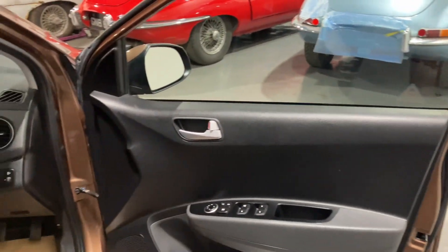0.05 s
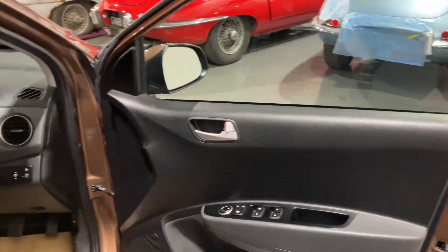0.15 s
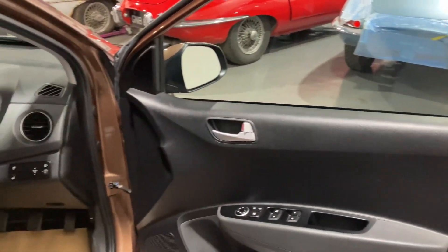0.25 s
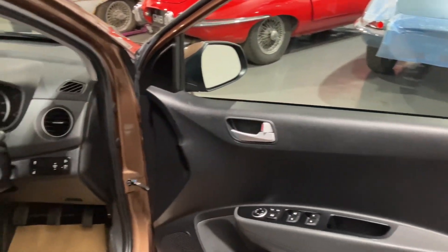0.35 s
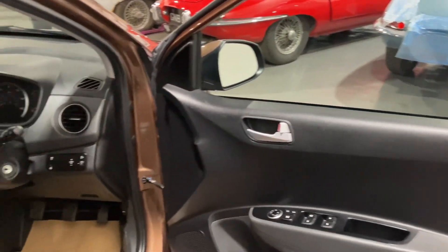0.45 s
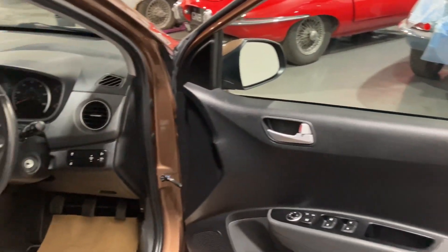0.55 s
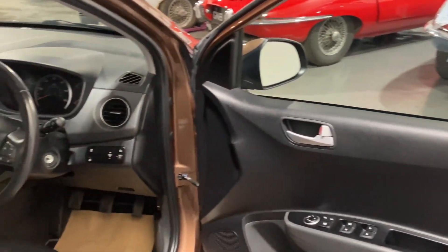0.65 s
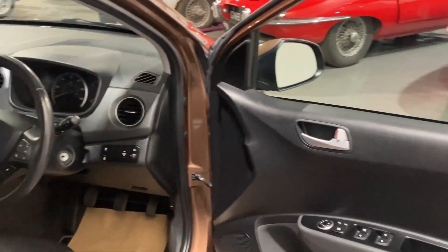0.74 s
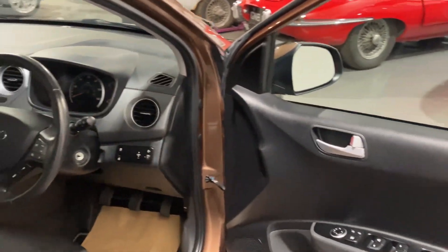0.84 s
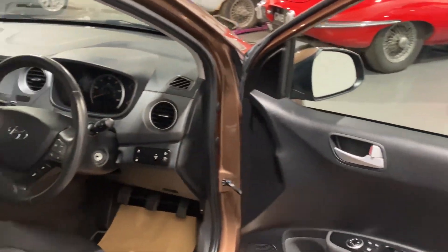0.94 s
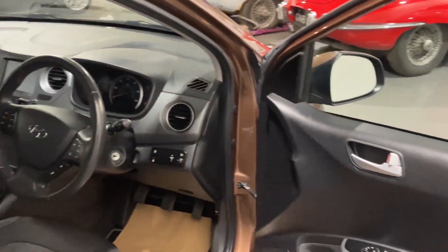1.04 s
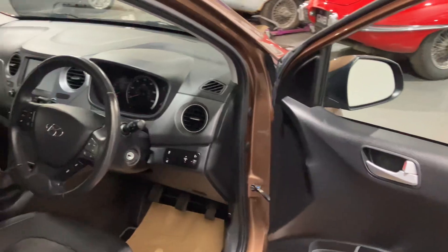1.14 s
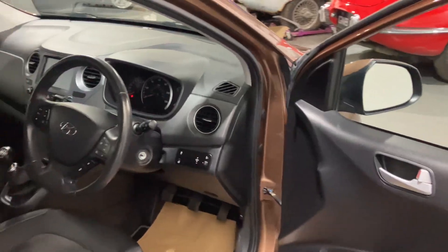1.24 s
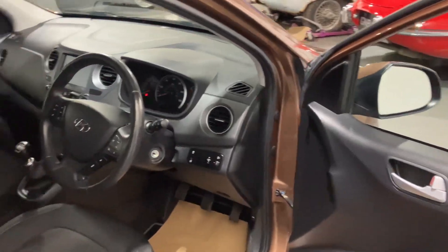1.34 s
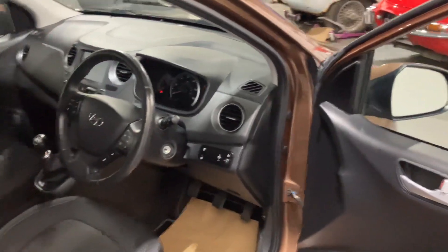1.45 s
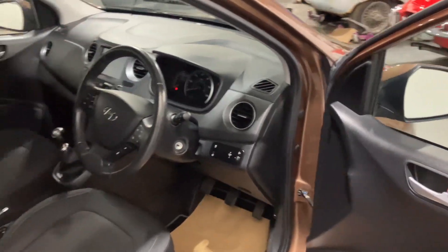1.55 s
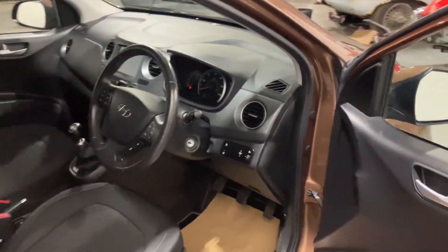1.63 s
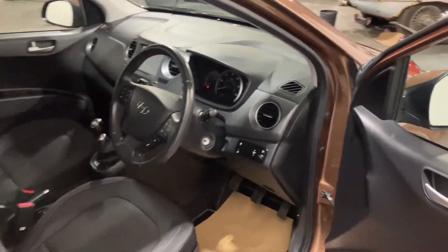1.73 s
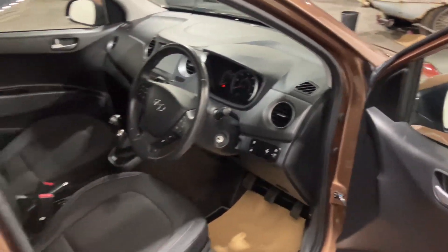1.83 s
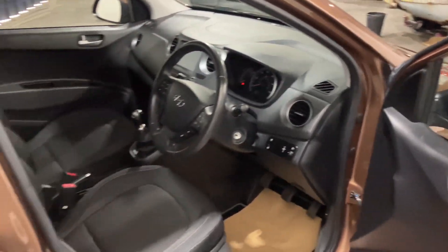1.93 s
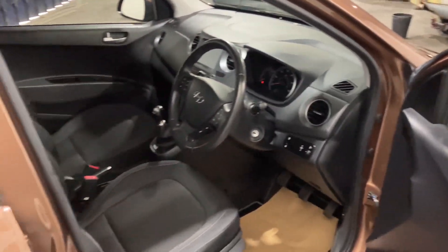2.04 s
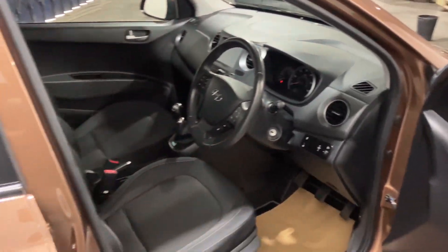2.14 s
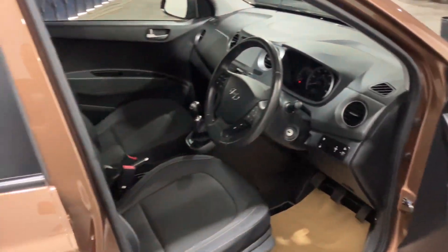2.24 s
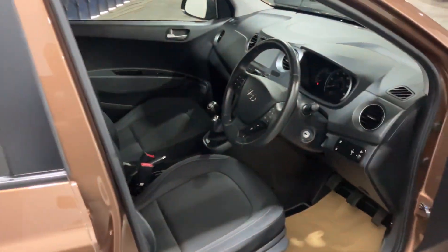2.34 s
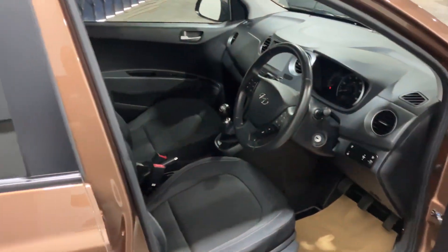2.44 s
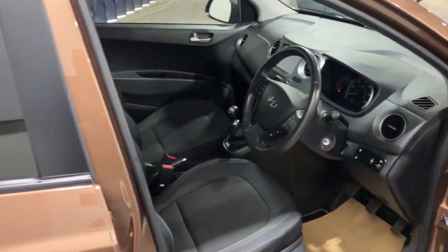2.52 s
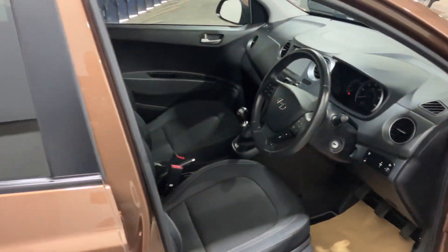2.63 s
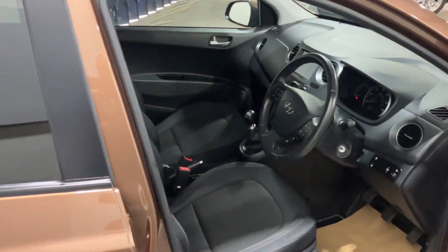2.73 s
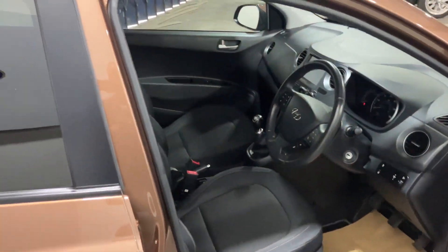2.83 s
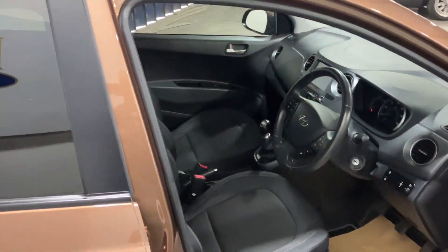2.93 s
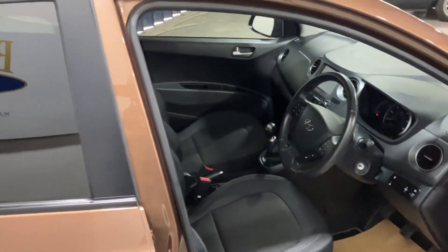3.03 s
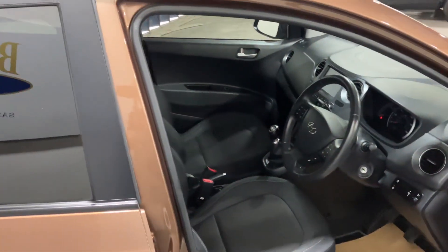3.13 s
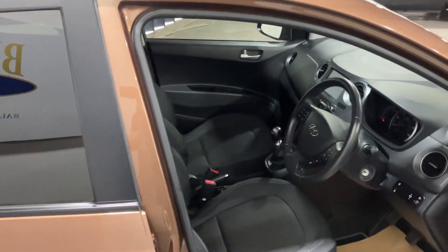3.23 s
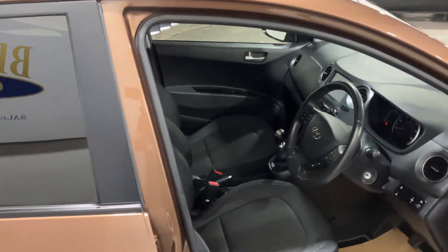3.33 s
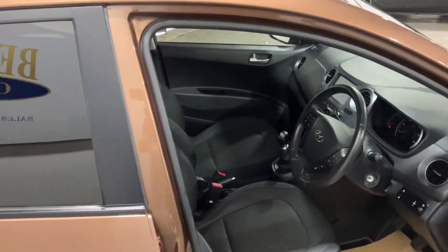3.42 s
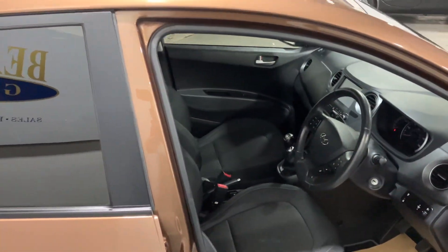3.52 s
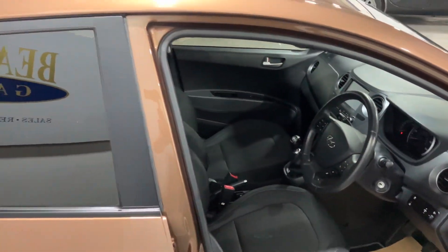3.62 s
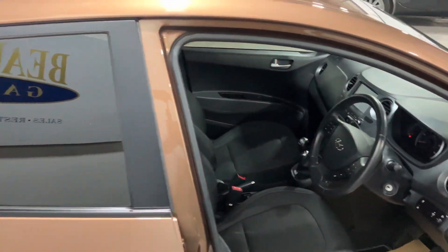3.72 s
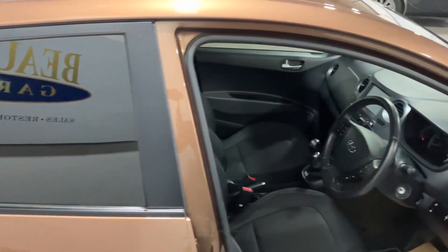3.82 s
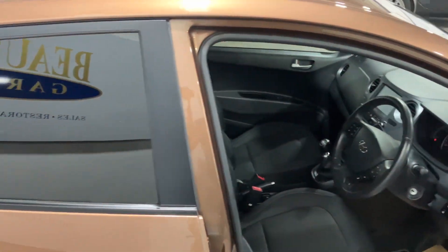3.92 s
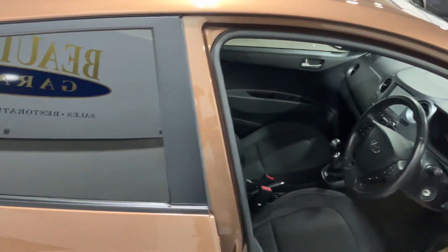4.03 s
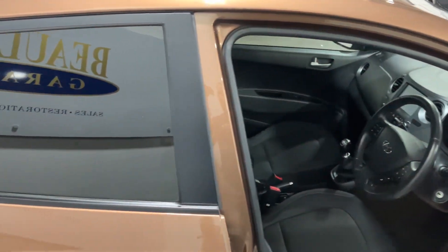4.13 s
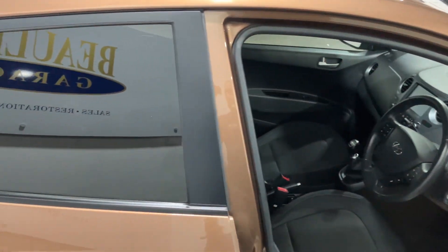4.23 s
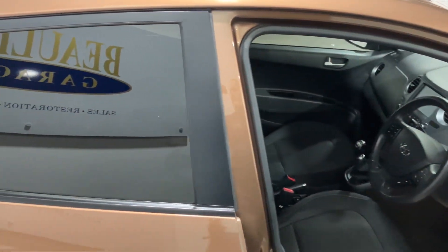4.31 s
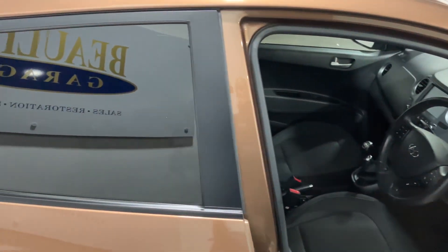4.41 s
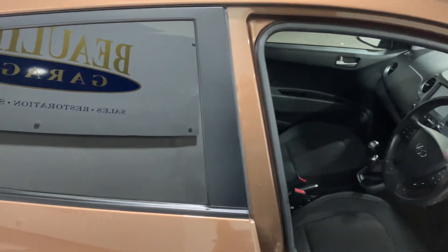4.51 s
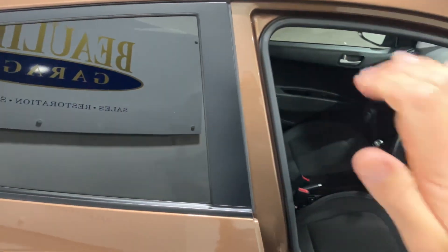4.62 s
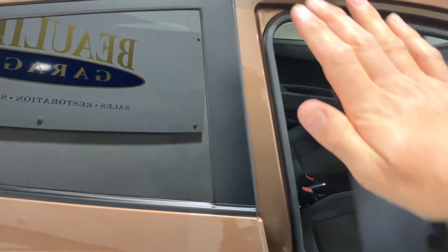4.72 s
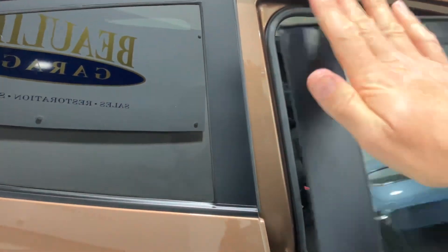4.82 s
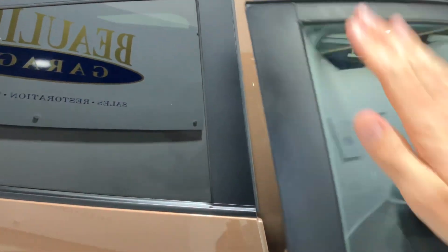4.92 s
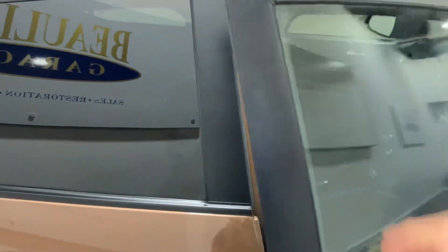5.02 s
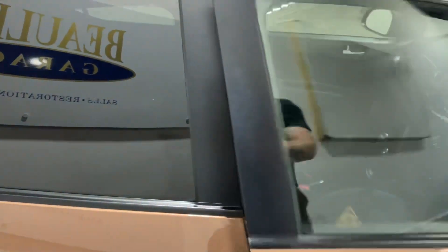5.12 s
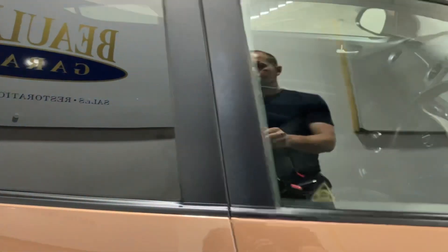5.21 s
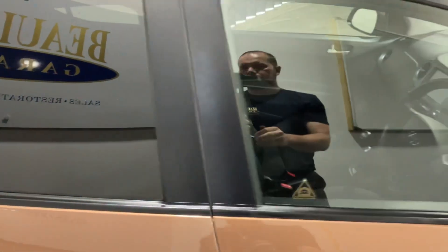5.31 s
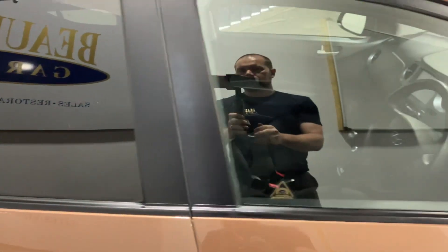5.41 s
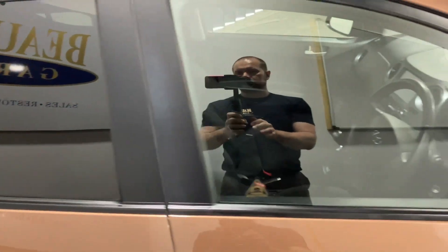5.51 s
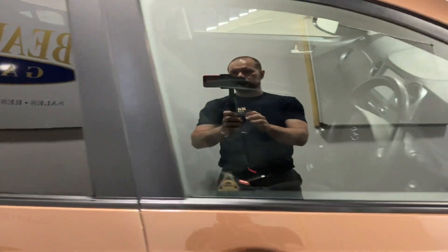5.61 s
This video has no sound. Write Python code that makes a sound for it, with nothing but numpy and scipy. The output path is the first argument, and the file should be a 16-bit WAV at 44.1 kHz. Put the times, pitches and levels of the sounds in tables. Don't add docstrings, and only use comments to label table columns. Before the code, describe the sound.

Inside a large hard-floored hall, a hand-held phone picks up low traffic rumble and a faint distant engine rev. Light clicks, rustling and a loud sharp snap come early, followed by more clicks and soft footsteps. After a quiet stretch, a car door at arm's length is pushed shut: brief air rush, latch crack, deep boom, rattling trim and a decaying hall echo.

```python
import sys
import numpy as np
from scipy import signal
from scipy.fft import rfft, irfft, next_fast_len
from scipy.io import wavfile
from scipy.ndimage import uniform_filter1d

SR = 44100
rng = np.random.default_rng(int(sys.argv[2]) if len(sys.argv) > 2 else 0)


def gain_from_db(level_db):
    decades = np.asarray(level_db, float) / 20
    return 10 ** decades


def store_pcm(level_fs):
    pcm = np.round(np.clip(level_fs, -1, 1) * 32767).astype(np.int16)
    wavfile.write(sys.argv[1], SR, np.atleast_2d(pcm).T)


N = 249606
T, SIZE = np.arange(N) / SR, next_fast_len(N + 8192, True)
F = np.arange(SIZE // 2 + 1) * SR / SIZE + 1e-3

LATCH_S = 5.2345
BEND_S = .0028


def on_log(table, hz, index=1):
    table = np.array(table)
    return np.interp(np.log(hz), np.log(table[:, 0]), table[:, index])


def column(table, index, x):
    table = np.array(table)
    return np.interp(x, table[:, 0], table[:, index])


def shape(x, gain):
    return irfft(rfft(x, SIZE) * gain, SIZE)[..., :N]


def low_cut(hz, order):
    return 1 / (1 + (hz / F) ** order)


def unit(x):
    return x / np.sqrt(np.mean(x ** 2))


def band(hz, octaves):
    return np.exp(-.5 * (np.log2(F / hz) / octaves) ** 2)


def walk(rate_hz):
    k = int(SR / rate_hz)
    held = np.repeat(rng.standard_normal(N // k + 1), k)
    return 2.29 * uniform_filter1d(uniform_filter1d(held, k), k)[:N]


def pair(hz, octaves):
    # hz, correlation [0 to 1]
    likeness = [(60, .93), (130, .75), (400, .55), (1400, .2), (3000, .5), (4600, .1), (6000, .4),
                (7500, .8), (8800, .97), (15000, .97)]
    c = on_log(likeness, F)
    noise = rng.standard_normal((2, SIZE))
    mid, side = shape(noise, band(hz, octaves) * np.sqrt([1 + c, 1 - c]))
    return unit(np.array([mid + side, mid - side]))


def ring(start_s, modes):
    t = np.clip(T - start_s, 0, None)
    live = slice(int(start_s * SR), int((start_s + .8) * SR))
    out = np.zeros(N)
    for hz, db, t60_s in modes:
        out[live] += gain_from_db(db - 60 * t[live] / t60_s) * np.sin(2 * np.pi * hz * t[live])
    return out


def place(x, pan_db, lag_s):
    left = shape(x, gain_from_db(pan_db / 2) * np.exp(-2j * np.pi * F * lag_s))
    return np.array([left, x * gain_from_db(-pan_db / 2)])


def tone(times_s, hz, db, wobble, flicker_db, rate_hz):
    edge = np.clip(np.minimum(T - times_s[0], times_s[-1] - T) / 0.055, 0, 1)
    cycles = np.cumsum(np.interp(T, times_s, hz) * (1 + wobble * walk(rate_hz))) / SR
    level = gain_from_db(np.interp(T, times_s, db) + flicker_db * walk(rate_hz))
    return np.sqrt(2) * edge * level * np.sin(2 * np.pi * cycles)


def rustle(table, octaves):
    out = 0
    for start_s, length_s, db, hz in table:
        u = np.clip((T - start_s) / length_s, 0, 1)
        swell = np.sin(np.pi * u ** .4) ** 0.72
        out = out + pair(hz, octaves) * gain_from_db(db + 2.14 * walk(250)) * swell
    return out


def clicks(table, ring_s, crack_s, contact_s, low_hz):
    colour = band(3450, 0.3) + .5 * band(7400, 1.0) + 0.19 * band(14000, 0.84) + 0.053 * band(3300, .9)
    hiss = unit(shape(rng.standard_normal(N), colour))
    out = np.zeros((2, N))
    size = int(contact_s * SR)
    for start_s, db, hz, crack_db, pan_db in table:
        r = rng.standard_normal(200)
        t60_s = ring_s(hz)
        over_hz, under_hz = hz * (1.5 + 0.056 * r[0]), hz * (.75 + 0.01 * r[1])
        body = ring(start_s, [(hz, -1, t60_s), (-over_hz, -6, 0.28 * t60_s), (-under_hz, -7, t60_s)])
        contact = np.hanning(size) * (1 + .3 * r[:size]) * 2 / size
        body = signal.fftconvolve(body, contact)[:N]
        after = np.clip(T - start_s, 0, 1) / crack_s
        burst = after * np.exp(1 - after)
        tail = .1 * (T > start_s) * np.exp(-after / 9)
        crack = hiss * gain_from_db(crack_db + 2.5) * (burst + tail)
        out += gain_from_db(db + np.array([[pan_db], [-pan_db]]) / 2) * (body + crack)
    return shape(out, low_cut(low_hz, 4))


def hush():
    # start_s, level_db
    rumble = [(0.0, -53.5), (0.03, -64), (1.26, -59), (1.48, -54), (1.97, -61.5), (2.31, -58), (3.25, -62),
              (4.42, -57.5), (4.58, -63.5), (4.63, -56), (5.08, -59), (5.15, -57)]
    # hz, level_db [per Hz]
    spectrum = [(18, -25), (28, -15.5), (40, -2.5), (60, -0.5), (85, -2), (125, -9.5), (170, -14.5),
                (250, -24.5), (420, -22.5), (600, -31), (1700, -39.5), (4000, -47.5), (10000, -48),
                (16000, -55.5)]
    hush_db = -56.5
    deep_db = column(rumble, 1, T) + 1.4 - hush_db
    upper_db = 0.41 * deep_db + 1.5 * walk(18) - 0.85
    out = 0
    for hz in 22 * 2 ** np.arange(0, 9.6, .4):
        swell_db = deep_db if hz < 130 else upper_db * np.clip(np.log2(1600 / hz) / 1.3, 0, 1)
        drift_db = 1.8 * walk(14) * (150 < hz < 900) + .8 * walk(7.5)
        out = out + pair(hz, 0.2) * np.sqrt(hz) * gain_from_db(on_log(spectrum, hz) + swell_db + drift_db)
    return out * gain_from_db(hush_db - 24.0)


def engine():
    times_s = [.2, 1.5, 1.85]
    return tone(times_s, [54, 70.4, 66.4], [-69.5, -58, -71], 0.0077, 2.3, 8)


def whines():
    # start_s, loudest_s, end_s, pitch_hz, peak_db
    runs = [
        (0.855, .98, 1.15, 2900, -82.5),
        (1.17, 1.24, 1.87, 2873, -83),
        (3.33, 3.58, 4.22, 8720, -82.5),
        (5.295, 5.45, 5.2, 8600, -78.5),
    ]
    out = 0
    for start_s, peak_s, end_s, hz, db in runs:
        wobble, rate_hz, lag_s = (.024, 600, -.00017) if hz < 5000 else (.004, 150, .000064)
        faint_db = db - 14.5 * min(end_s - start_s, 1)
        line = tone([start_s, peak_s, end_s], [hz] * 3, [faint_db, db, faint_db], wobble, 2.66, rate_hz)
        out = out + place(line, 0, lag_s)
    return out


def weight_shifts():
    # start_s, length_s, level_db, centre_hz
    thuds = [(0, 0.2, -69, 222), (1.0, 0.36, -74.5, 260), (1.452, .05, -63, 340), (2.39, 0.37, -72.5, 248),
             (3.2, 0.13, -75, 201), (3.46, 0.059, -66.5, 196.4), (4.1, 0.14, -72.5, 304),
             (4.5, 0.28, -72.5, 250), (5.0, 0.11, -71, 296)]
    return rustle(thuds, .5)


def cloth():
    # start_s, length_s, level_db, centre_hz
    brushes = [(0.311, 0.21, -78.5, 8000), (0.557, 0.11, -70, 4000), (0.65, 0.1, -66.5, 1100),
               (.66, 0.17, -71, 4600), (1.188, 0.12, -77.5, 6440), (1.447, 0.018, -44, 2240),
               (1.47, 0.27, -70.5, 3030), (1.645, 0.015, -53.5, 1900), (1.6, 0.14, -76, 9400),
               (2.25, 0.085, -68, 4950), (2.273, 0.036, -59.5, 900), (2.364, 0.019, -57.5, 2500),
               (2.364, 0.18, -69, 3600), (2.427, 0.042, -60.5, 1570), (2.859, 0.13, -80.5, 8250),
               (3.429, 0.041, -69.5, 6000), (3.5, 0.025, -85, 3500), (4.379, 0.067, -71.5, 890),
               (4.62, 0.078, -77.5, 2000), (4.705, 0.1, -74, 4610)]
    return rustle(brushes, 1.05)


def soles():
    # start_s, length_s, level_db, centre_hz
    drags = [(0, 0.043, -73.5, 1530), (0.0067, 0.19, -82.5, 3620), (.085, 0.06, -77.5, 1490),
             (0.785, 0.052, -65, 370), (1.44, 0.016, -59.5, 3895), (2.03, 0.065, -84, 9540),
             (2.367, 0.015, -54.5, 936), (2.7, 0.035, -75, 348), (3.436, 0.073, -68.5, 485),
             (3.429, 0.031, -72, 1625), (4.392, 0.075, -66, 457), (4.511, 0.054, -65, 400),
             (4.609, 0.057, -78.5, 2910), (4.725, 0.059, -74.5, 3300), (4.732, 0.057, -68.5, 1440)]
    return rustle(drags, 0.321)


def squeaks():
    # start_s, length_s, level_db, centre_hz
    narrow_patches = [
        (1.3, 0.46, -87, 3370),
        (1.646, 0.01, -43, 3310),
        (2.364, 0.01, -42.5, 3520),
    ]
    return rustle(narrow_patches, 0.042)


def footsteps():
    # start_s, peak_db, ring_hz, crack_db, pan_db [left minus right]
    steps = [
        (1.452, -64, 592, -15, 5),
        (2.284, -53.5, 316, -17, 0),
        (2.824, -43, 113.2, -41.5, -5),
        (3.428, -45, 504, -21.5, 2),
    ]
    return clicks(steps, lambda hz: .08, 0.0036, 0.0016, 70)


def joint_clicks():
    # start_s, peak_db, ring_hz, crack_db, pan_db [left minus right]
    ticks = [(0.09, -59.5, 840, -16, -4), (0.56, -52.5, 1290, 0, -8), (0.607, -50.5, 2020, -33, -14),
             (0.777, -67, 960, -11, -17), (1.217, -53, 880, -13, -9), (1.359, -64, 1040, -23, -10),
             (1.647, -39, 933, -5.5, 0), (1.663, -47.5, 1220, 2.5, -4.5), (1.878, -52, 1215, -11, -11),
             (1.973, -58.5, 1196, -32, -0.5), (2.251, -64, 1000, -6, -7), (2.276, -37.5, 1210, -10.5, -3.5),
             (2.365, -30, 1890, -6, -2.5), (2.432, -48.5, 1140, -7.5, -5), (2.58, -57.5, 1784, -31, -1.0),
             (2.613, -55, 1900, -21, -4), (2.684, -64.5, 1433, -15.5, 5.5),
             (3.299, -69.5, 840, -7.5, -12.5)]
    cycles = 19.2
    return clicks(ticks, lambda hz: cycles / hz, 0.000613, .0004, 620)


def snap():
    # start_s, peak_db, pan_db [left minus right]
    event = [
        (1.454, -15, -3),
    ]
    # mode_hz, level_db, t60_s
    modes = [(810, -16.5, 0.0047), (988, -13, 0.018), (1256, 0, 0.019), (1418, 1.5, 0.0091),
             (1644, -5.5, 0.015), (1874, -16.5, 0.0098), (2472, -18.5, .006), (3053, -8.5, 0.0045),
             (3500, -6, 0.012), (4086, -6, 0.0055), (5240, -14.5, .005), (6850, -9, 0.0066),
             (9400, -18, .004)]
    start_s, db, pan_db = event[0]
    body = ring(start_s + .0003, modes[:6]) + ring(start_s, modes[6:])
    body = body + gain_from_db(-11.0) * ring(start_s + .0035, modes[:8])
    after = np.clip(T - start_s, 0, 1)
    decay = gain_from_db(-16.5) * np.exp(-after / .0015) + gain_from_db(-20.0) * np.exp(-after / .012)
    crack = pair(2500, 0.91) * (T > start_s) * decay
    return shape(place(gain_from_db(db - 6.0) * body, pan_db, 0) + gain_from_db(db) * crack, low_cut(720, 6))


def air_rush():
    start_s, peak_s, stop_s = 5.165, 5.234, 0.018
    early_s = np.clip(peak_s - T, 0, 1)
    top_hz = 1100 * 2 ** (-13 * early_s)
    rush = 0
    for hz in [200, 400, 800, 1600, 3200, 6400]:
        rush = rush + pair(hz, 0.56) * np.sqrt(hz / 400) / (1 + (hz / top_hz) ** 3.07)
    level = gain_from_db(-31.5 - 458 * early_s)
    opening = np.clip((T - start_s) / 0.013, 0, 1)
    return rush * level * opening * np.clip(1 - (T - peak_s) / stop_s, 0, 1)


def latch():
    # hz, level_db [per Hz]
    spectrum = [(88, -31), (150, -5), (346, 1.5), (925, 1.5), (1260, -12), (2300, -21), (2780, -29.5),
                (3670, -21.5), (5000, -47), (6500, -75), (11000, -120)]
    sweep = np.exp(-2j * np.pi * (F * LATCH_S + 2 * BEND_S * np.sqrt(1000 * F)))
    crack = irfft(gain_from_db(on_log(spectrum, F)) * (F > 120) * sweep, SIZE)[:N]
    return crack * gain_from_db(-5.5) / np.abs(crack).max()


def boom():
    # start_s, gain [negative is inverted]
    blows = [
        (5.2431, 1),
        (5.2808, .9),
        (5.436, -.13),
        (5.4737, -.07),
    ]
    # mode_hz [negative starts the other way], level_db, t60_s
    modes = [(53.5, -3.4, .19), (63.6, -14.4, .96), (-68.3, 0, .04), (75.8, -16.1, .38), (-80.7, -7.5, .12),
             (143.9, -20.5, .17)]
    struck = sum(gain * ring(start_s, modes) for start_s, gain in blows)
    return uniform_filter1d(struck, int(.003 * SR))


def panel_rings():
    # mode_hz, level_db, t60_s
    modes = [(176, -23, 0.18), (209, -26, 0.18), (237.4, -21, 0.16), (307, -24, 0.16), (343, -25.5, 0.13),
             (393.3, -26, 0.15), (495, -34, 0.18), (580, -26, 0.061), (668, -34, 0.11), (826, -32, 0.1),
             (915, -50, 0.078), (984, -22, 0.09), (1275, -30, 0.099), (1390, -34, 0.057)]
    # start_s, level_db
    rebounds = [
        (5.251, -5),
        (5.2585, -9.5),
        (5.2761, -12.5),
    ]
    panel = ring(LATCH_S + 2 * BEND_S, modes)
    for start_s, db in rebounds:
        struck = []
        for hz, mode_db, t60_s in modes:
            r, q = rng.standard_normal(2)
            struck.append((hz * (1 + 0.0275 * r) * np.sign(r), mode_db + 2.2 * q, t60_s))
        panel = panel + gain_from_db(db) * ring(start_s, struck)
    return panel


def jolt(peak_s, t60_s):
    rise = np.clip(1 + (T - peak_s) / 0.012, 0, 1) ** 2
    return gain_from_db(-60 * np.clip(T - peak_s, 0, 9) / t60_s) * rise


def rattle():
    # peak_s, trim_db, glass_db
    jolts = [
        (5.222, -43, -62),
        (5.237, -27, -44),
        (5.254, -22.5, -47.5),
        (5.298, -65, -55.5),
    ]
    trim = pair(493, 0.78) + gain_from_db(-5) * pair(1374, 0.37) + gain_from_db(-12) * pair(2610, 0.5)
    glass = gain_from_db(2.5) * pair(5040, 0.45) + pair(8370, 0.42) + gain_from_db(-10.5) * pair(13000, 0.46)
    out = jolt(jolts[-1][0], 1.26) * (gain_from_db(-44.5) * trim + gain_from_db(-67.5) * glass)
    for peak_s, trim_db, glass_db in jolts:
        out = out + jolt(peak_s, 0.076) * (gain_from_db(trim_db) * trim + gain_from_db(glass_db) * glass)
    return gain_from_db(1.7 * walk(300)) * out


def door():
    metal = place(latch() + panel_rings(), 0, -0.00017)
    return boom() + metal + air_rush() + rattle()


def hall(x):
    # band_hz, level_db, t60_s
    decays = [(59.65, -29, 0.91), (119.4, -12.5, 1.1), (250.3, -9.5, 0.76), (400, -11, 0.91),
              (752, -15.5, 1.4), (1297, -13, 1.3), (2196, -14, 1.4), (4000, -11, 1.3), (7030, -11, 0.27),
              (14000, -19, 0.38)]
    answer = 0
    for hz in 45 * 2 ** np.arange(0, 8.6, .6):
        t60_s = on_log(decays, hz, index=2)
        fade = gain_from_db(on_log(decays, hz) - 60 * np.minimum(T, 2) / t60_s)
        answer = answer + pair(hz, 0.38) * np.sqrt(hz / t60_s) * fade
    answer = answer * np.clip((T - .004) / 0.014, 0, 1) * (T < 1.5) * gain_from_db(-81.5)
    return signal.fftconvolve(answer[:, :2 * SR], x[None], axes=1)[:, :N]


def scene():
    background = hush() + engine() + whines()
    dry_floor = weight_shifts() + squeaks()
    rub = cloth() + soles()
    small = footsteps() + joint_clicks()
    crack, slam = snap(), door()
    near = gain_from_db(-9) * crack + gain_from_db(-8.5) * small + gain_from_db(-8) * rub
    walls = hall(near.sum(axis=0)) + hall(gain_from_db(-2) * slam.sum(axis=0))
    return background + dry_floor + rub + small + crack + slam + walls


def roll_off(x):
    return signal.sosfilt(signal.butter(12, 16600, fs=SR, output="sos"), x)


def record(dry):
    # hz, left_minus_right_db
    microphone = [(60, -3), (200, -1.5), (400, .5), (2400, .3), (4400, -1), (15000, 0)]
    # hz, lead_rad
    ports = [(0, 0), (520, 0.2), (3190, -3.5), (4050, -3.0), (5080, -9.9), (5860, -10.0), (8350, -15.0),
             (16200, -25.6)]
    tilt = gain_from_db(on_log(microphone, F) / 2)
    top = 1 / (1 + (F / 15900) ** 80)
    left = shape(dry[0], top * tilt * np.exp(1j * column(ports, 1, F)))
    right = shape(dry[1], top / tilt)
    return roll_off(np.array([left, right]))


dry = scene()
out = record(dry)
store_pcm(out)
```